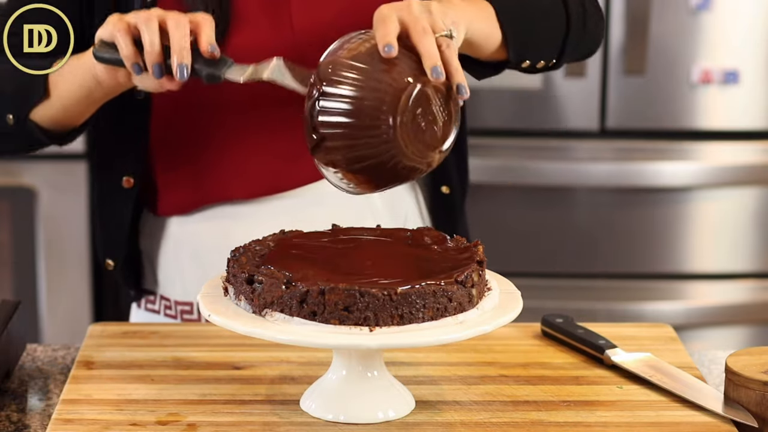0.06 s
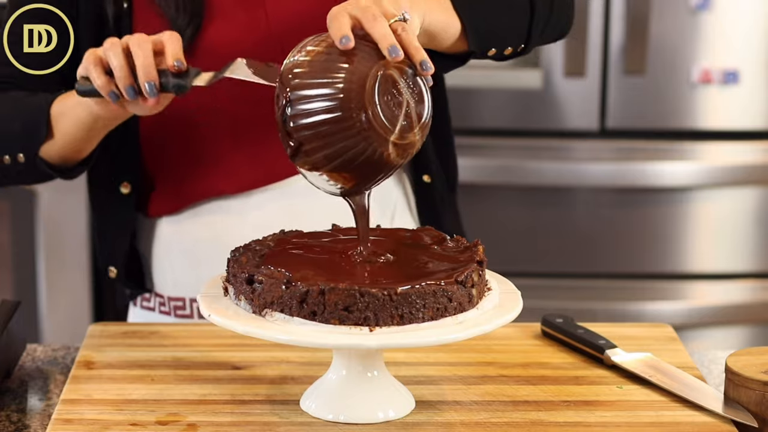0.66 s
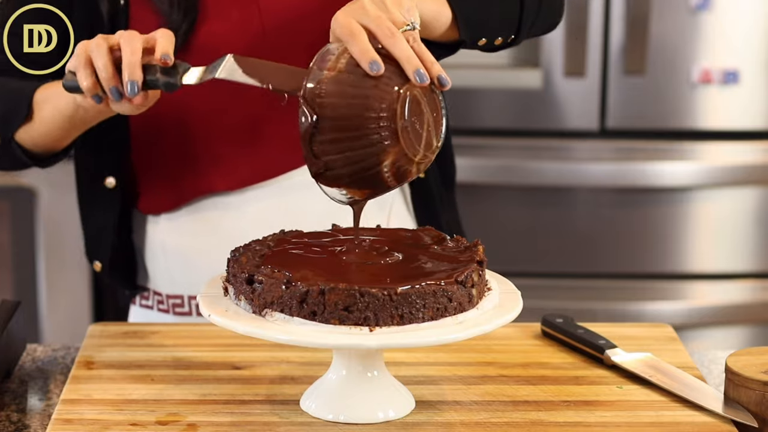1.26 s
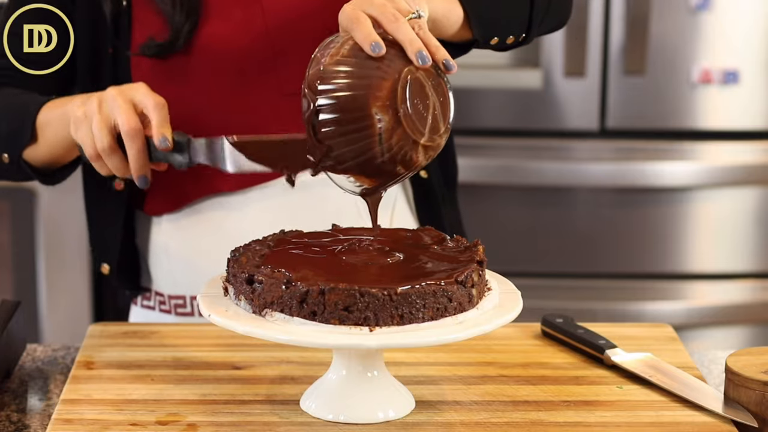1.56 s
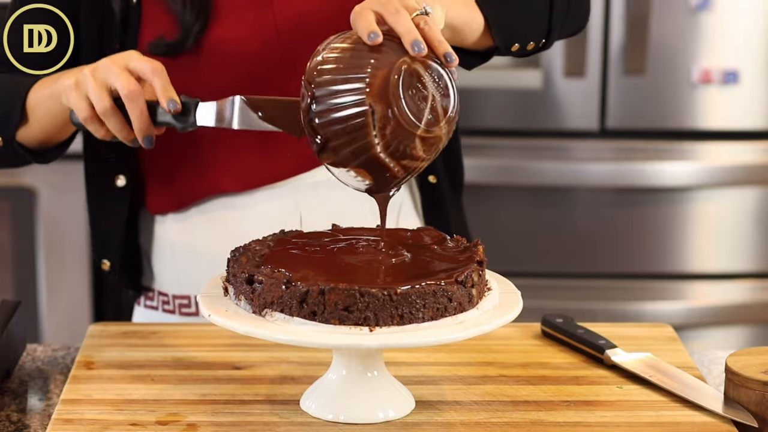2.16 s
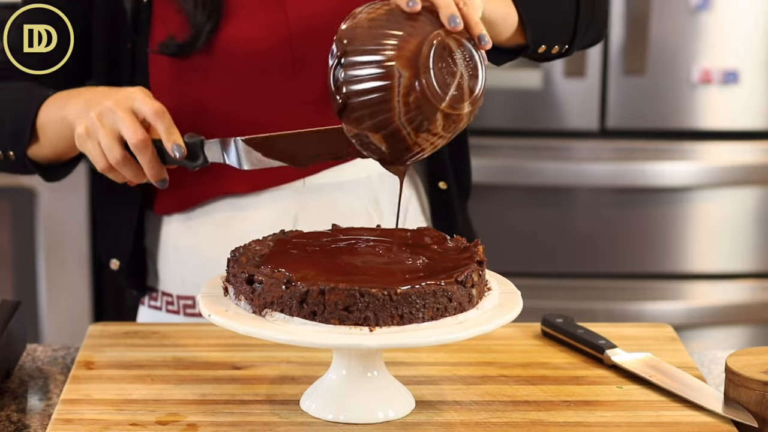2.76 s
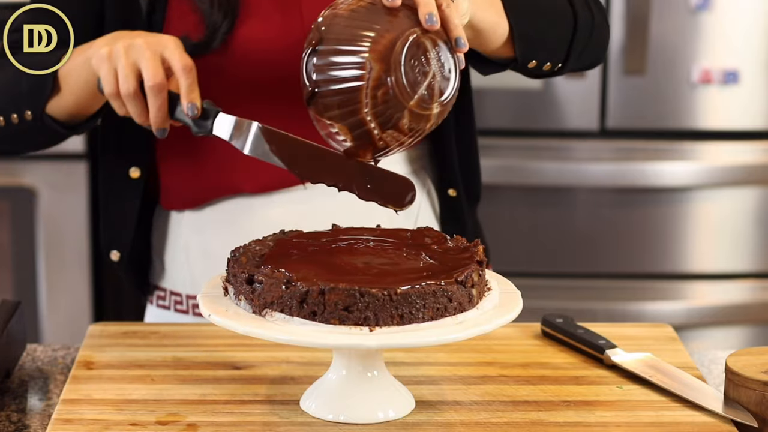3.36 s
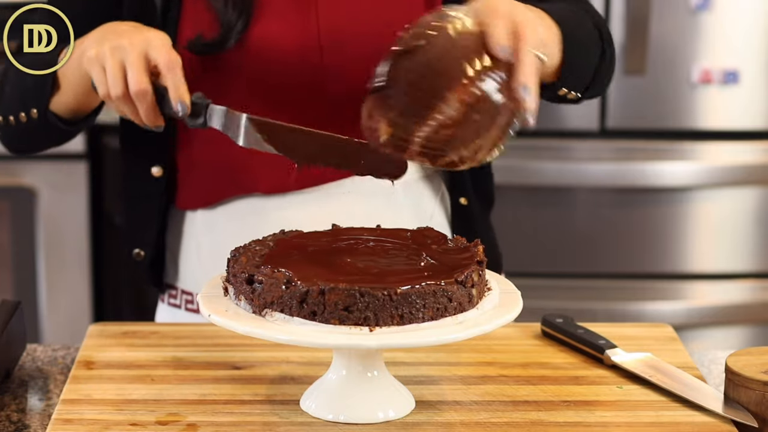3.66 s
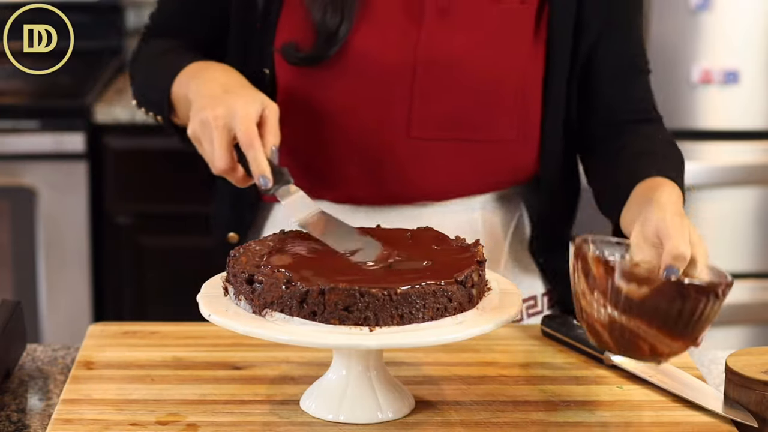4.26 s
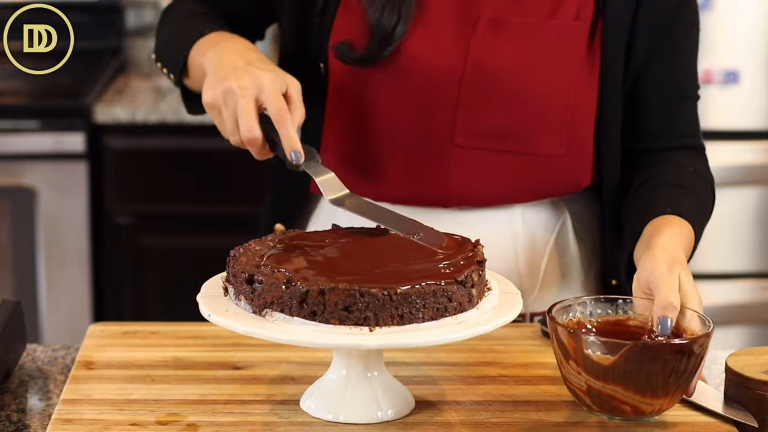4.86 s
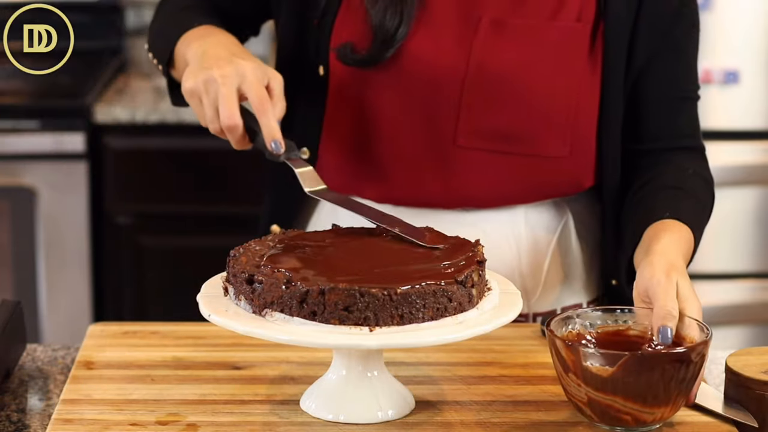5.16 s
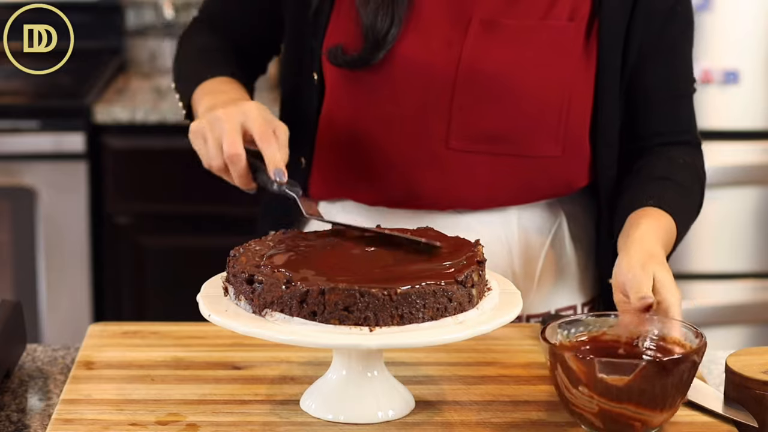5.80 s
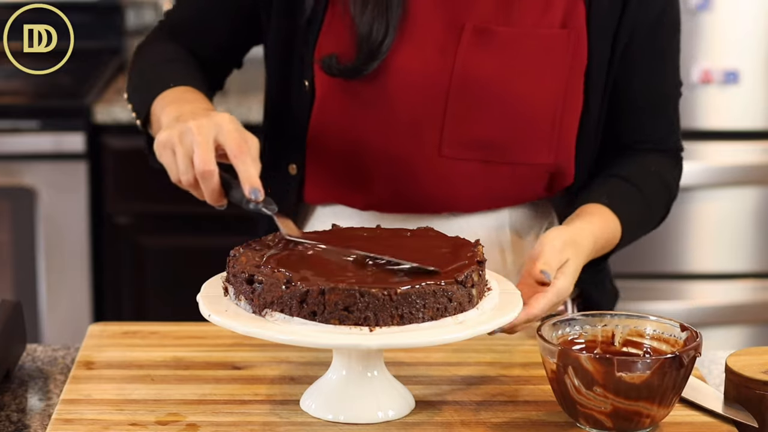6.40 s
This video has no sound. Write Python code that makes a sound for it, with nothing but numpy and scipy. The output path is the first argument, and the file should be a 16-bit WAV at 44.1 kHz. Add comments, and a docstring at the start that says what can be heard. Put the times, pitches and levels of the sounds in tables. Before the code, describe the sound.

A steel spatula scrapes chocolate glaze from a glass bowl, making irregular bright clinks, some sharp and some dulled by the glaze, with brief squeaks and gritty scrapes between them. The clinking stops and sleeves rustle faintly. After a soft tap, the bowl lands on a wooden board with a double knock and rocks once. The sounds are close, with a short kitchen echo over faint ventilation and electrical hum.

```python
"""A kitchen, where a steel spatula scrapes chocolate glaze out of a hand-held glass bowl.
The blade clinks as it lands, squeaks as it sticks and slips, and grates on the glass; the glaze
dulls the lighter touches. Sleeves rustle, then the bowl is set down on a wooden board and
rocks once. Ventilation and a faint mains hum lie underneath."""
import sys
import numpy as np
from scipy import signal
from scipy.fft import rfft, irfft, next_fast_len
from scipy.io import wavfile
from scipy.ndimage import uniform_filter1d

SR = 44100
rng = np.random.default_rng(int(sys.argv[2]) if len(sys.argv) > 2 else 0)


def transcribe(u):
    """Save the signal u as a 16-bit wav file named by the first command-line argument.

    u: samples, shape (n,) or (channels, n), limited to [-1, 1]; the rate is SR.
    q: integer samples, one column per channel.
    """
    v = np.clip(np.atleast_2d(u).T, -1, 1)
    q = np.round(v * 32767).astype(np.int16)
    wavfile.write(sys.argv[1], SR, q)


N = 283726
LEAD = SR // 10   # samples of pre-roll, so the scene opens mid-ring
TIME = np.arange(-LEAD, N) / SR
AGE = np.arange(SR // 2) / SR   # seconds since a contact began


def from_db(db):
    return 10 ** (np.asarray(db) / 20)


def rms_one(x):
    return x / np.sqrt(np.mean(x ** 2) + 1e-20)


def at_hz(points, hz):
    """Read a curve on a log-frequency axis."""
    known_hz, values = np.transpose(points)
    return np.interp(np.log(hz), np.log(known_hz), values)


def noise(spectrum, size=len(AGE), tilt_db=0):
    """Coloured noise of rms 1, tilted by tilt_db per octave above 1 kHz."""
    hz = np.maximum(np.fft.rfftfreq(size, 1 / SR), 1)
    colour = from_db(at_hz(spectrum, hz) + tilt_db * np.log2(np.maximum(hz, 1000)))
    return rms_one(irfft(rfft(rng.standard_normal(size)) * colour, size))


def wobble(samples):
    """Random movement of rms 1, smoothed over this many samples."""
    return rms_one(uniform_filter1d(rng.standard_normal(len(AGE)), size=samples))


def decay(t60, hold=0):
    """Full level for hold seconds of contact, then a free decay."""
    return from_db(-60 * np.maximum(AGE - hold, 0) / t60)


def attack(seconds):
    return 1 - np.exp(-AGE / seconds)


def swell(length, edge):
    """A stroke that fades in and out, each over the share edge of its length."""
    return np.clip(np.minimum(AGE, length - AGE) / (edge * length), 0, 1)


def ringing(modes, hold=0, detune=1, tilt_db=0, pivot_hz=1000, scatter_db=0):
    """Struck modes: each blow lands elsewhere, so phases vary, and strengths by scatter_db."""
    out = 0
    for (hz, db, t60), (luck, turn) in zip(modes, rng.standard_normal((len(modes), 2))):
        gain = from_db(db + tilt_db * np.log2(hz / pivot_hz) + scatter_db * luck)
        out = out + gain * decay(t60, hold) * np.sin(2 * np.pi * (hz * detune * AGE + turn))
    return out


def add(track, start_s, sound):
    """Lay a sound into a track."""
    start = max(LEAD + round(start_s * SR), 0)
    track[start:start + len(sound)] += sound[:len(track) - start]


# The low wash of the ventilation. Each row: frequency in Hz, relative noise density in dB.
VENT_COLOUR = [(15, -23), (25, -13.5), (72, -6), (190, -4.5), (242, -3.5), (427, 1), (489, -0.5),
               (560, -5.5), (641, -5.5), (840, -11), (1040, -11.5), (2160, -27.5), (3430, -29),
               (14800, -35.5), (16000, -37.5)]
# The mains hum. Each row: frequency in Hz, level in dB.
MAINS_TONES = [(59.7, -72.5), (241.5, -73.5)]


def room_tone(vent_db=-61):
    """A steady bed of moving air and mains hum."""
    air = from_db(vent_db) * noise(VENT_COLOUR, next_fast_len(len(TIME)))[:len(TIME)]
    hum = sum(np.sqrt(2) * from_db(db) * np.sin(2 * np.pi * hz * TIME) for hz, db in MAINS_TONES)
    return air + hum


BARE_DB = -32   # the force that just pushes through the glaze
MUFFLE = 0.52   # dB of ring lost for each dB short of it


def cushioned(force_db):
    """By how many dB a contact falls short of pushing through the glaze."""
    return max(BARE_DB - force_db, 0)


# What rings in a clink. Each row: frequency in Hz, relative level in dB, 60 dB decay in seconds.
BLADE_BENDING = [(2066, -16.5, 0.043), (2980, -17, .07), (3772, -0.5, 0.096), (3855, -7, 0.045),
                 (4130, -9.5, 0.033), (5024, -13.5, .09), (5100, -11.5, 0.057), (5990, -6.5, 0.046),
                 (6030, -13, 0.043), (6270, -14.5, 0.035), (7130, -15.5, .07), (7880, -13, 0.04),
                 (8400, -11.5, 0.015), (8600, -17.5, 0.046)]   # damped by hand and glaze
SPATULA_FLEXING = [(733, -17.5, 0.083), (1007, -17.5, 0.091), (1090, -19, 0.068), (1900, -21, 0.053)]   # the hollow note of the whole tool
BLADE_TWISTING = [(2155, -15, 0.12), (2860, -16, 0.078), (4400, -1, 0.055), (5700, -18, .09),
                  (7100, -13.5, 0.052), (10460, -14, 0.021), (11055, -19, .07)]
BOWL_MODES = [(924, -20, 0.12), (2269, 2.5, .06), (2365, -8.5, 0.15), (4180, 0.5, 0.04), (4070, -5.5, 0.12),
              (6455, 1.5, 0.048), (6580, -14, .13), (9200, -24, .15), (10240, -7.5, 0.04),
              (12500, -19.5, .05)]   # glass, mostly in close pairs
# Dense, short-lived modes, played as noise. Each row: frequency in Hz, relative density in dB.
STEEL_CRACK = [(150, -21.5), (550, -8), (800, -9), (1050, 1.5), (1500, -4), (2300, -2.5), (3200, -2),
               (4200, 2.5), (5400, -4.5), (6500, 1), (8000, -5.5), (10500, -6), (13300, -12.5),
               (16000, -25.5)]
GLASS_GRIT = [(600, -27), (1100, -2), (2200, 2.5), (3200, -3.5), (4000, 6), (5200, -1), (6700, -4),
              (7500, -15), (11000, -14), (16000, -29.5)]
# Blade meets glass. Each row: start in seconds, force in dB, blade pitch in Hz, then flexing,
# twisting and bowl in dB over the bending, and chatter time in seconds.
BLADE_HITS = [(-0.040, -27, 3837, 11.5, -9, -16, 0.0024), (0.2834, -32.5, 3792, 6.5, -14, -28, 0.012),
              (0.418, -49, 3630, 20, -9, 6, .008), (0.685, -34, 3800, 9.5, -4, -34, .009),
              (0.789, -34, 3813, 5.5, 1.5, -32, 0.004), (0.867, -49, 3700, -11, 17, 3, .006),
              (1.102, -34, 3807, 2.5, 4, -6.5, .013), (1.1533, -34.5, 3710, -4, -19, -2, .002),
              (1.9262, -21, 3840, -12, -2, -16.5, .007), (2.235, -53.5, 3800, 0, -9, -0.5, .008),
              (2.3071, -21.5, 3837, -7, 1.5, -9.5, .003), (2.674, -33, 3894, -6.5, -16.5, 0.5, .005),
              (2.8706, -53.5, 3770, -0.5, -8, 15, .001), (3.3538, -34, 3837, 4, 7.5, 14.5, .0005),
              (3.5315, -46, 3880, 4, -9, 13, 0.0048)]


def clinks(blade_hz=3830, brightening=0.12, dulling=0.29):
    """The blade snaps down and chatters, ringing steel and glass; light touches stay dull."""
    out = np.zeros(len(TIME))
    for start, force_db, pitch_hz, flex_db, twist_db, bowl_db, chatter in BLADE_HITS:
        detune = pitch_hz / blade_hz   # the point of contact shifts the pitch
        families = (BLADE_BENDING, 0), (SPATULA_FLEXING, flex_db), (BLADE_TWISTING, twist_db)
        blade = sum(from_db(db) * ringing(modes, chatter, detune, scatter_db=2.02)
                    for modes, db in families)
        tilt_db = -0.07 + brightening * max(force_db - BARE_DB, 0) - dulling * cushioned(force_db)
        snap = 0.58 * (decay(0.055, hold=chatter / 2) + from_db(3.5) * decay(0.011))
        crack = from_db(force_db) * snap * noise(STEEL_CRACK, tilt_db=tilt_db)
        # the glass gives a brief clack, then its few strong modes ring on
        clack = from_db(4) * decay(0.014) * noise(GLASS_GRIT, tilt_db=-0.05)
        glass = clack + ringing(BOWL_MODES, tilt_db=-3.45, pivot_hz=2250)
        ring = blade * attack(0.0012) + from_db(bowl_db) * glass * attack(0.00015)
        ring_db = force_db - 1.7 - MUFFLE * cushioned(force_db)
        add(out, start, crack + from_db(ring_db) * ring)
    return out


# The soft, low colour of cloth. Each row: frequency in Hz, relative noise density in dB.
CLOTH_COLOUR = [(20, -5), (50, -4), (115, 1), (200, -9), (350, -11), (900, -33), (3000, -54)]
# Arm movements. Each row: start in seconds, length in seconds, level in dB.
SLEEVE_MOVES = [(-0.02, 0.1, -57.5), (3.642, 0.061, -57.5), (4.034, 0.041, -57.5), (4.185, 0.11, -57),
                (4.386, 0.098, -54)]


def rustles():
    """Sleeves move with the arm in soft, low puffs."""
    out = np.zeros(len(TIME))
    for start, length, db in SLEEVE_MOVES:
        add(out, start, from_db(db) * noise(CLOTH_COLOUR) * swell(length, edge=0.14))
    return out


# The timbre of a squeak. Each row: harmonic number, relative level in dB.
SLIP_HARMONICS = [(1, -7), (2, 0), (3, -14), (4, -11), (5, -29)]
# The edge catches. Each row: start in seconds, length in seconds, top pitch in Hz, gain in dB,
# overtone trim in dB.
EDGE_SQUEAKS = [(0.794, 0.017, 2470, -33.5, -7), (0.818, 0.033, 2617, -38, -2),
                (0.854, 0.026, 2625, -36, -2.5), (1.36, .115, 3225, -61, -15),
                (2.362, 0.094, 2667, -43, -21), (2.882, .04, 6640, -45.5, -29),
                (2.913, 0.025, 6520, -36.5, -24.5)]


def squeaks(pitch_sag=0.066, jitter=0.01, wander=0.0072, rasp_db=3):
    """Steel sticks and slips on glass: a raspy whistle whose pitch and level follow the pressure."""
    out = np.zeros(len(TIME))
    for start, length, top_hz, db, overtones_db in EDGE_SQUEAKS:
        pressure = np.sin(np.pi * np.minimum(AGE / length, 1) ** 0.8) ** 2   # peaks early
        hz = top_hz * (1 - pitch_sag * (1 - pressure) + jitter * wobble(50) + wander * wobble(400))
        phase = 2 * np.pi * np.cumsum(hz) / SR
        tone = sum(from_db(level + overtones_db * (harmonic > 1)) * np.sin(harmonic * phase)
                   for harmonic, level in SLIP_HARMONICS)
        add(out, start, np.sqrt(2) * from_db(db + rasp_db * wobble(70)) * pressure * tone)
    return out


# Scrapes on the glass, and a faint ring lingering after the clink at 1.15 s.
# Each row: start in seconds, length in seconds, force in dB, brightness in dB per octave.
SCRAPES_AND_RING = [(0.849, 0.027, -47.5, 0.5), (1.159, 0.094, -55, -3.5), (1.359, 0.092, -63.5, -1.5),
                    (1.574, 0.036, -68.5, 3), (2.884, 0.043, -45.5, -3), (3.455, 0.041, -50.5, -3.5),
                    (3.536, 0.037, -51, 2)]


def scrapes_and_ring(grain_db=2, pressed_t60=0.035, bowl_db=11):
    """Grainy noise excites the blade-damped bowl: the slips of a scrape, or a clink's faint ring."""
    out = np.zeros(len(TIME))
    glaze = signal.butter(2, 7500, fs=SR, output="sos")   # softens the top
    for start, length, force_db, tilt_db in SCRAPES_AND_RING:
        force = from_db(force_db) * rms_one(from_db(grain_db * wobble(60))) * swell(length, edge=0.2)
        response = signal.sosfilt(glaze, ringing(BOWL_MODES, tilt_db=tilt_db) * decay(pressed_t60))
        drive = force * rng.standard_normal(len(AGE))
        bowl = signal.fftconvolve(drive, response / np.linalg.norm(response))[:len(AGE)]
        grit = force * noise(GLASS_GRIT, tilt_db=tilt_db)
        add(out, start, from_db(bowl_db - MUFFLE * cushioned(force_db)) * bowl + grit)
    return out


# The dull colour of the tap. Each row: frequency in Hz, relative noise density in dB.
TAP_COLOUR = [(400, -12), (950, 5), (2000, -5), (3400, -11), (5000, -26), (12000, -42)]


def tap(start=4.9705, db=-45.5):
    """One soft tap with no ring as the bowl is lowered."""
    out = np.zeros(len(TIME))
    add(out, start, from_db(db) * noise(TAP_COLOUR) * decay(0.062) * attack(0.00076))
    return out


# The board's woody ring. Each row: frequency in Hz, relative level in dB, 60 dB decay in seconds.
BOARD_MODES = [(69.4, -24, 0.17), (268.6, -17.5, 0.1), (417, -15.5, 0.07), (545, -24.5, 0.21),
               (649, -10, 0.14), (729, -8.5, 0.15), (846, -2, 0.042), (1035, 1, 0.014), (1277, -8, 0.019)]
# The body of a knock. Each row: frequency in Hz, relative noise density in dB.
THUD_COLOUR = [(40, -21), (110, 1), (190, -6), (450, -3), (750, -0.5), (1150, -0.5), (1450, -30),
               (1800, -19.5), (3000, -36), (8000, -77)]
# The bowl lands and rocks. Each row: start in seconds, level in dB, hardness in dB per octave.
LANDINGS = [(5.6287, -25.5, 2), (5.6666, -27, 0.8), (5.852, -41.5, 3), (5.8669, -32.5, -2.5),
            (5.875, -44.5, 0)]


def knocks(contact_s=0.0007, thud_db=-4):
    """Thick glass on wood: a soft contact thuds and sets the board ringing."""
    out = np.zeros(len(TIME))
    onset = 1 - np.exp(-(AGE / contact_s) ** 2)
    for start, db, hardness in LANDINGS:
        wood = ringing(BOARD_MODES, hold=0.0017, tilt_db=hardness / 2, pivot_hz=694, scatter_db=2.7)
        thud = from_db(thud_db) * noise(THUD_COLOUR, tilt_db=hardness) * decay(0.04, hold=0.0022)
        add(out, start, from_db(db) * (wood + thud) * onset)
    return out


# The glassy edge on a knock. Each row: frequency in Hz, relative noise density in dB.
TICK_COLOUR = [(800, -11), (1700, 2), (2700, 3), (3000, -9), (3400, 8.5), (4500, -3), (5500, -39),
               (8500, -13), (14000, -42)]


def ticks(below_knock_db=26.5):
    """Each landing draws a faint tick from the glass foot, louder the harder it is."""
    out = np.zeros(len(TIME))
    for start, db, hardness in LANDINGS:
        add(out, start, from_db(db - below_knock_db + 3 * hardness) * noise(TICK_COLOUR) * decay(0.021))
    return out


# The kitchen's tail. Each row: frequency in Hz, 60 dB decay in seconds.
KITCHEN_DECAY = [(125, .45), (500, 0.68), (1200, 0.84), (3500, 0.68), (7000, 0.54), (10000, 0.37),
                 (16000, 0.46)]


def kitchen(x, first_echo_s, early_db, early_s=0.08):
    """Strong early echoes off counter and steel doors, then a tail dying octave by octave."""
    t = np.arange(SR) / SR
    white = rfft(rng.standard_normal(SR))
    hz = np.maximum(np.fft.rfftfreq(SR, 1 / SR), 1)
    tail = 0
    for centre in 62.5 * 2 ** np.arange(9):
        band = irfft(white * np.maximum(1 - np.abs(np.log2(hz / centre)), 0), SR)
        tail = tail + band * from_db(-60 * t / at_hz(KITCHEN_DECAY, centre))
    tail *= 1 - np.exp(-(t / first_echo_s) ** 2)
    tail *= from_db(early_db * np.exp(-(t / early_s) ** 2))
    return signal.fftconvolve(x, tail / np.linalg.norm(tail))[:len(x)]


def scene(glass_wet_db=-11, board_wet_db=-6.5):
    """Blade and bowl sit up close; the board sends more of its sound into the room."""
    glass = clinks() + squeaks() + scrapes_and_ring() + ticks()
    board = knocks() + tap()
    room = from_db(glass_wet_db) * kitchen(glass, first_echo_s=0.004, early_db=3)
    room += from_db(board_wet_db) * kitchen(board, first_echo_s=0.013, early_db=5.5)
    return (glass + board + room + rustles() + room_tone())[None, LEAD:]


def record(dry, cutoff_hz=15900):
    """A steep low-pass takes off the very top."""
    return signal.sosfilt(signal.ellip(10, 0.1, 80, cutoff_hz, fs=SR, output="sos"), dry)


dry = scene()
out = record(dry)
transcribe(out)
```